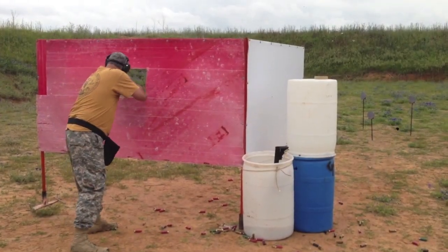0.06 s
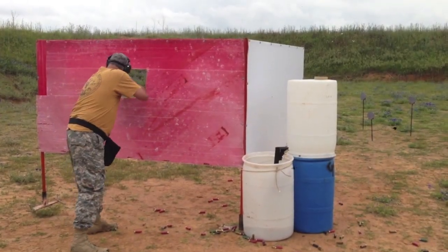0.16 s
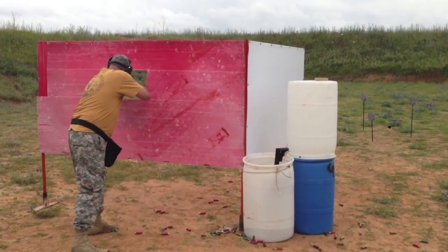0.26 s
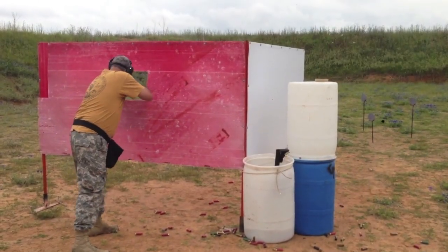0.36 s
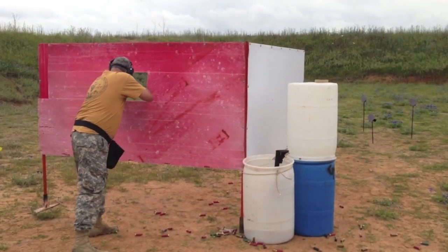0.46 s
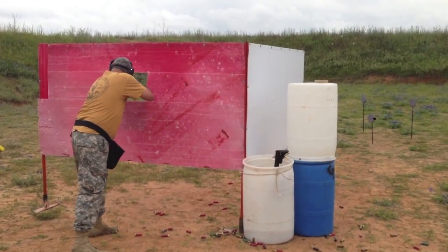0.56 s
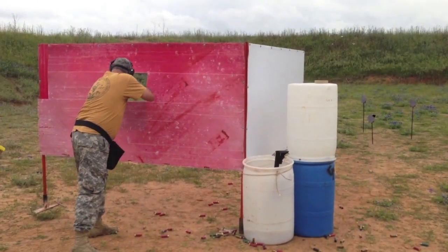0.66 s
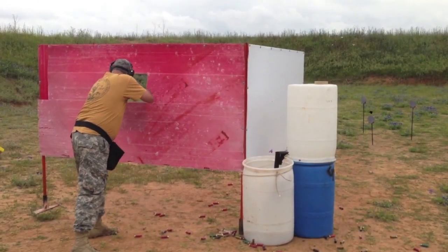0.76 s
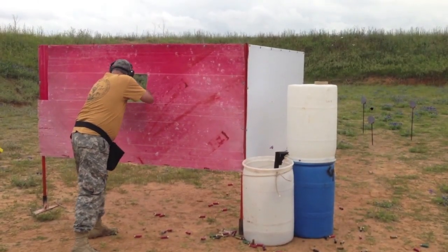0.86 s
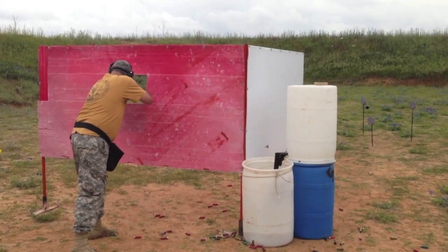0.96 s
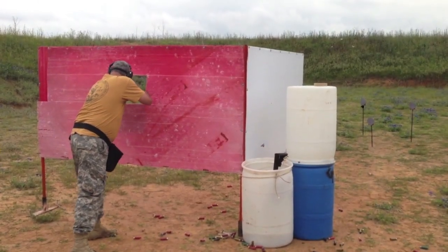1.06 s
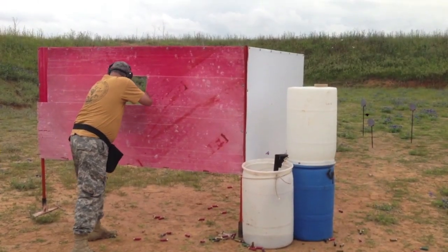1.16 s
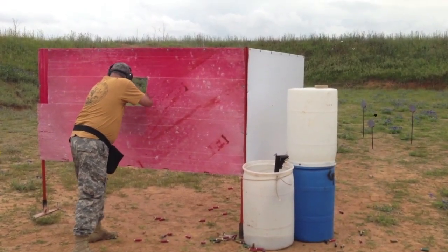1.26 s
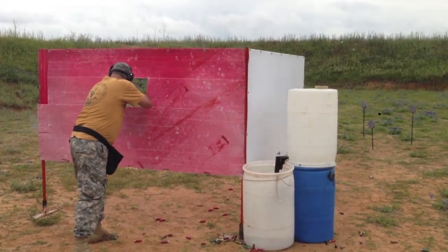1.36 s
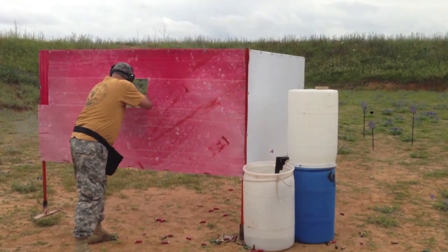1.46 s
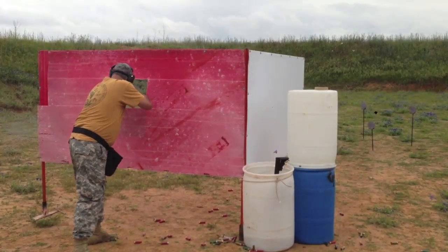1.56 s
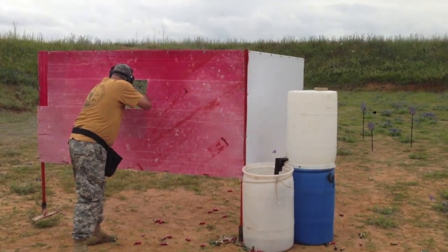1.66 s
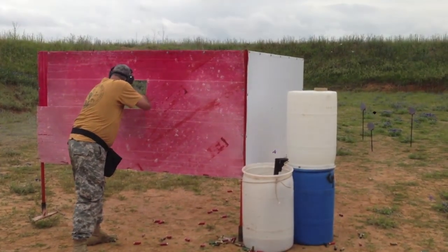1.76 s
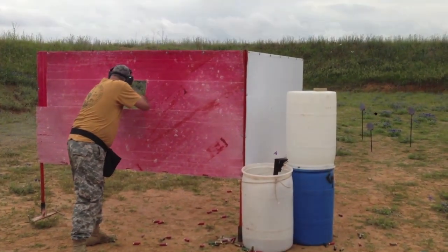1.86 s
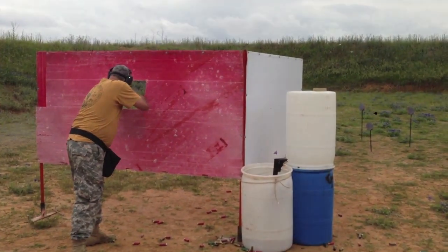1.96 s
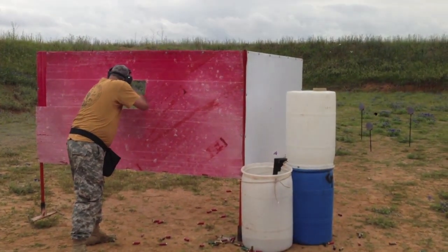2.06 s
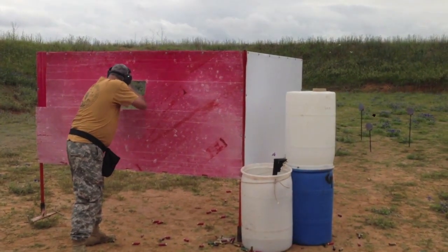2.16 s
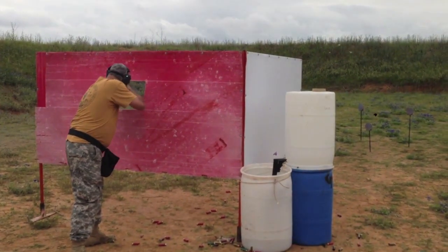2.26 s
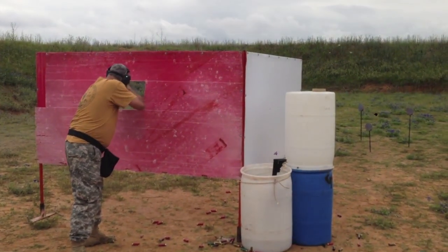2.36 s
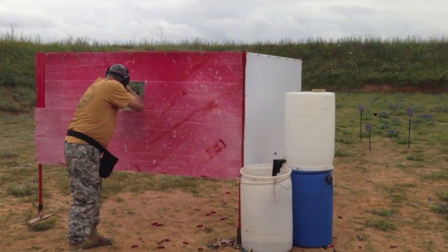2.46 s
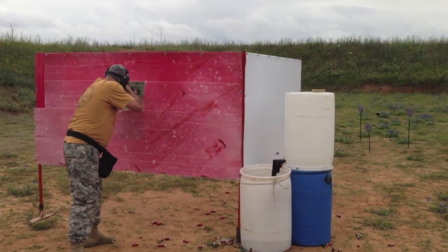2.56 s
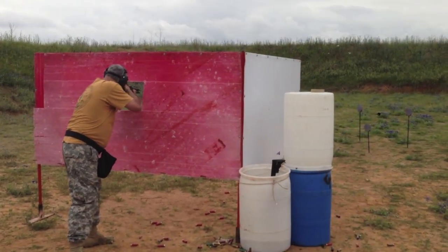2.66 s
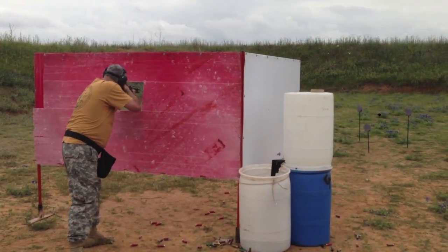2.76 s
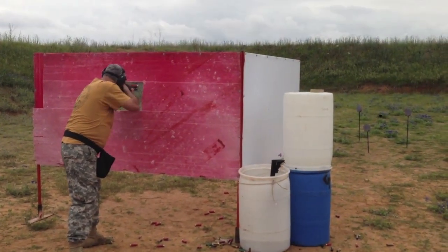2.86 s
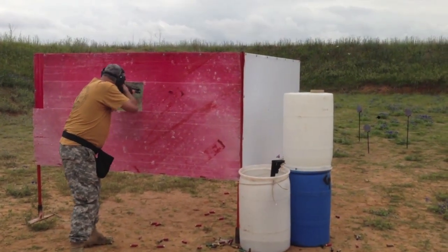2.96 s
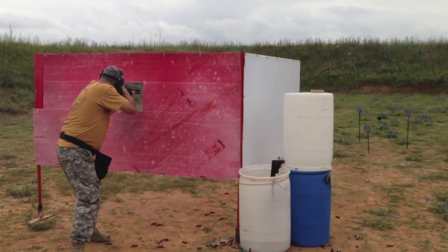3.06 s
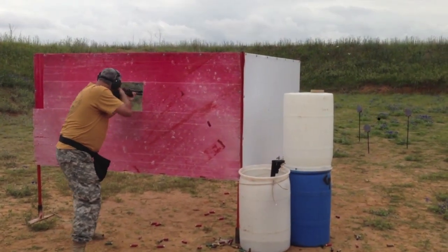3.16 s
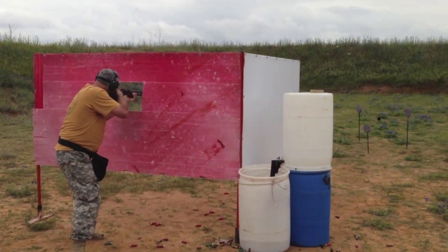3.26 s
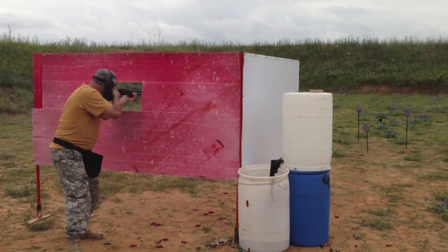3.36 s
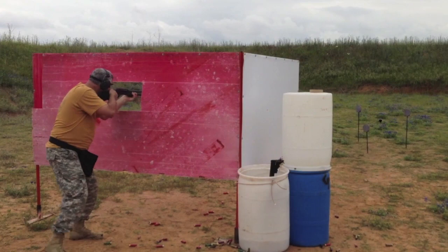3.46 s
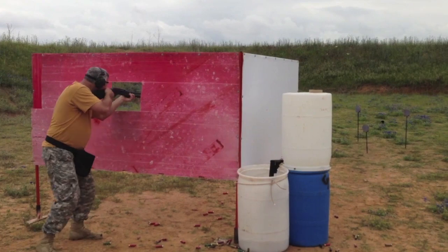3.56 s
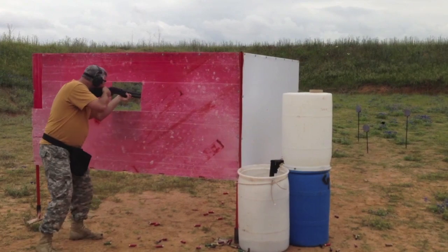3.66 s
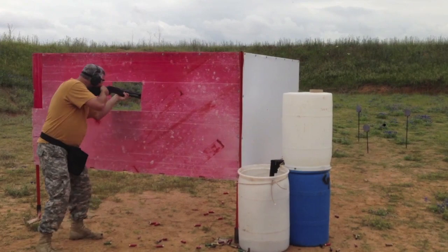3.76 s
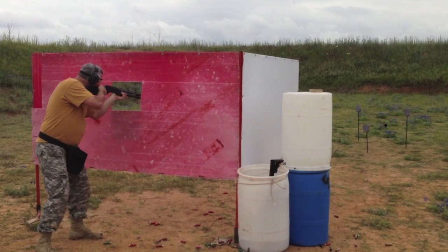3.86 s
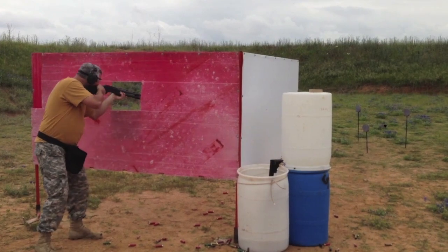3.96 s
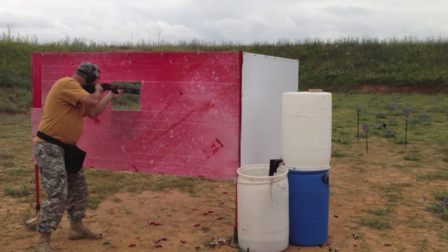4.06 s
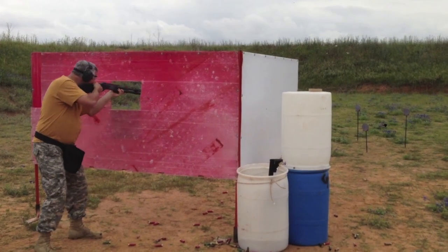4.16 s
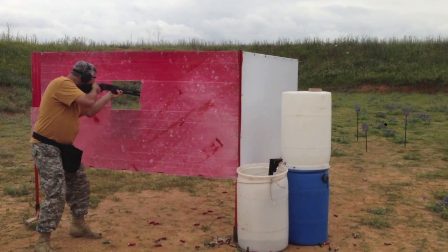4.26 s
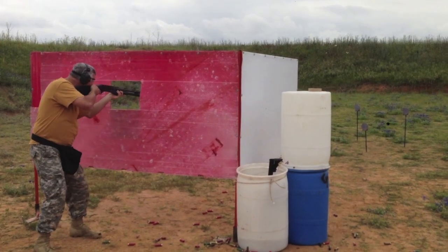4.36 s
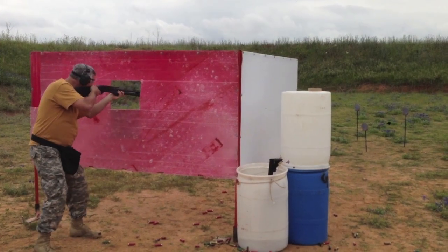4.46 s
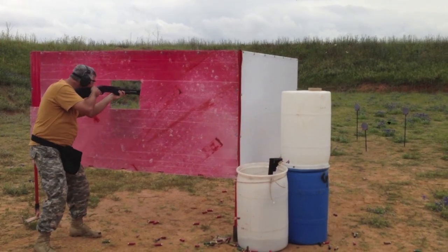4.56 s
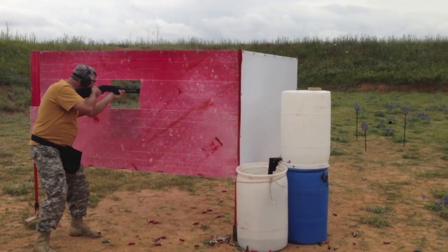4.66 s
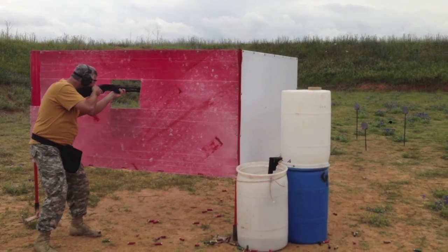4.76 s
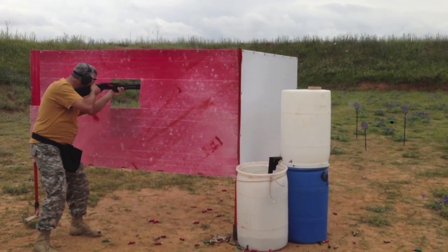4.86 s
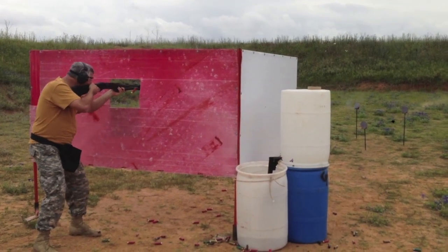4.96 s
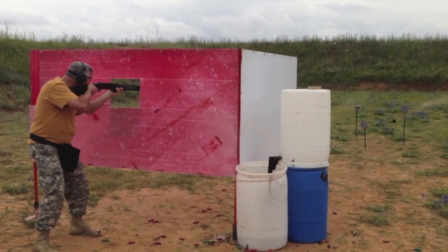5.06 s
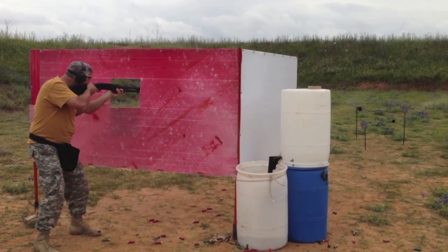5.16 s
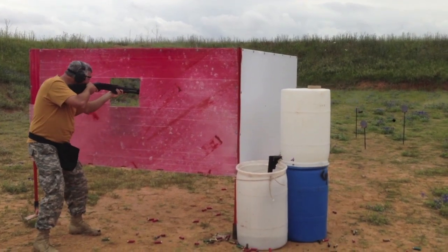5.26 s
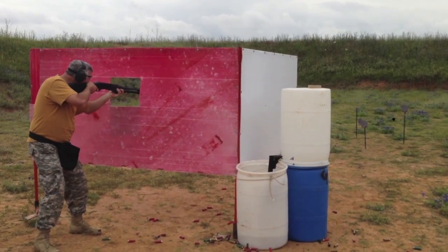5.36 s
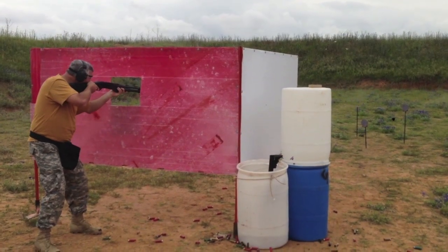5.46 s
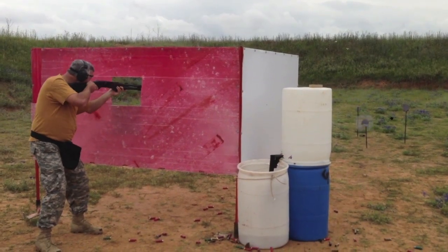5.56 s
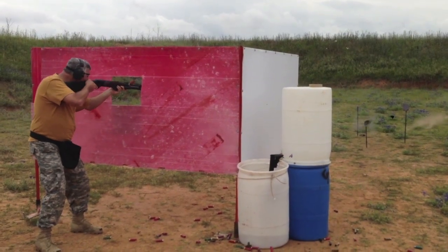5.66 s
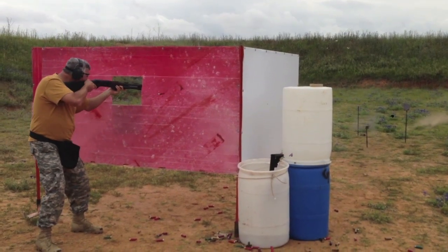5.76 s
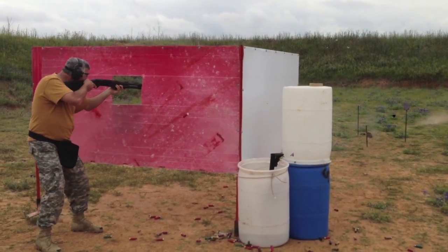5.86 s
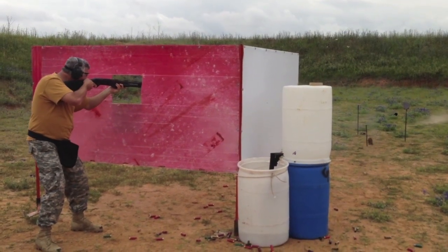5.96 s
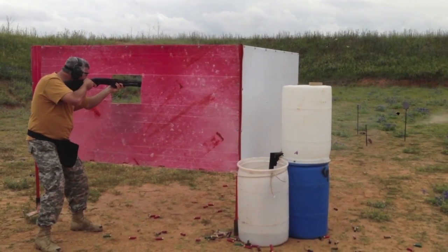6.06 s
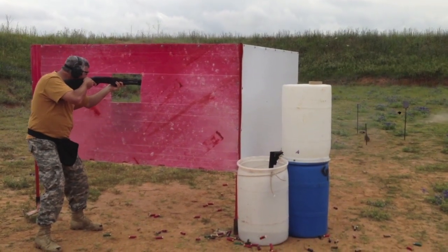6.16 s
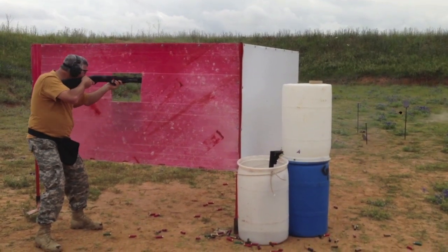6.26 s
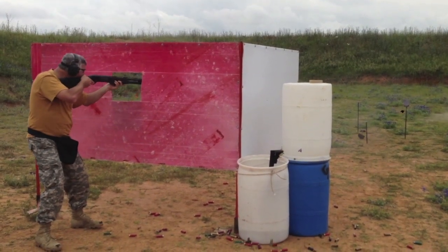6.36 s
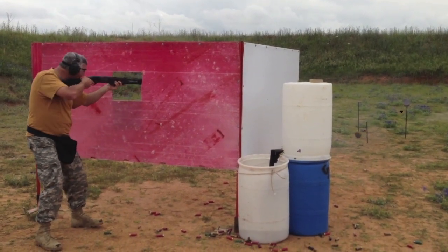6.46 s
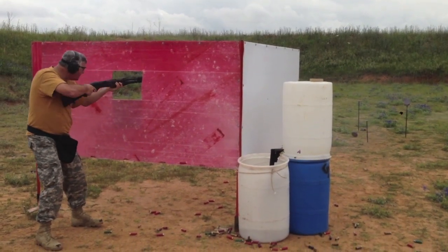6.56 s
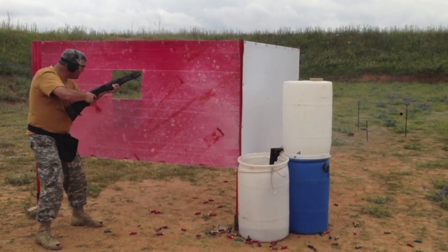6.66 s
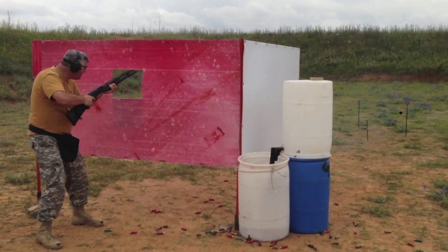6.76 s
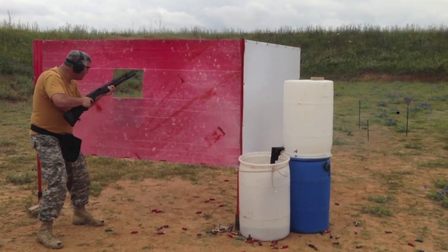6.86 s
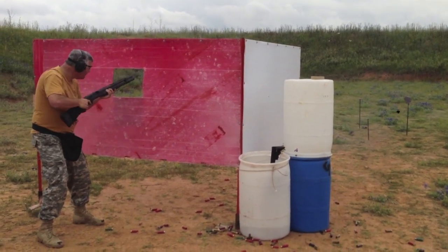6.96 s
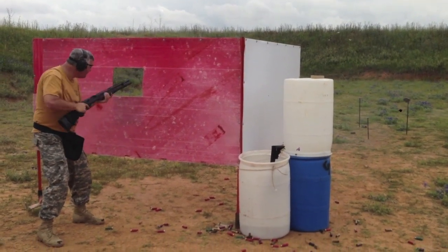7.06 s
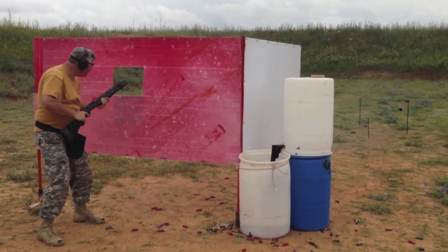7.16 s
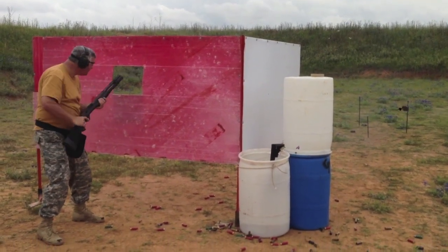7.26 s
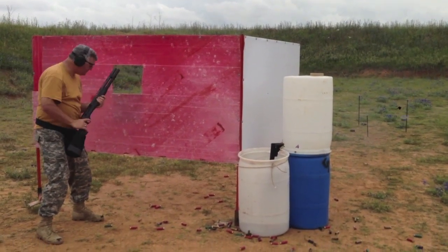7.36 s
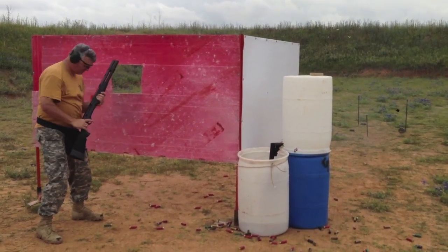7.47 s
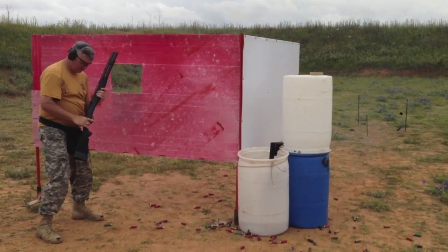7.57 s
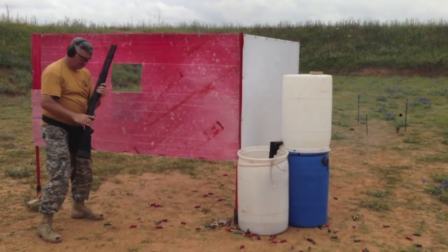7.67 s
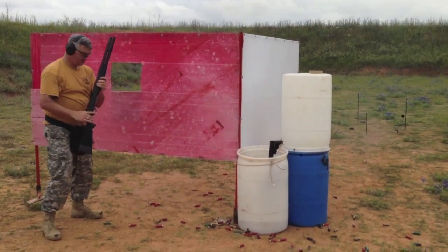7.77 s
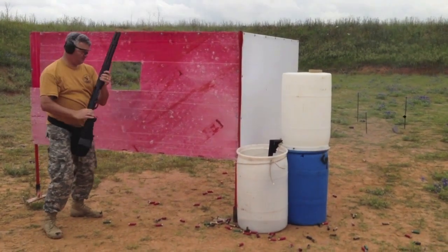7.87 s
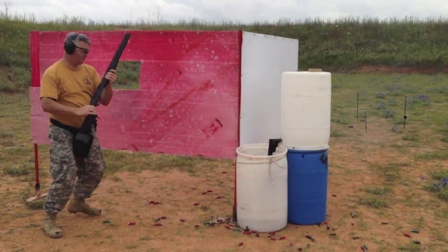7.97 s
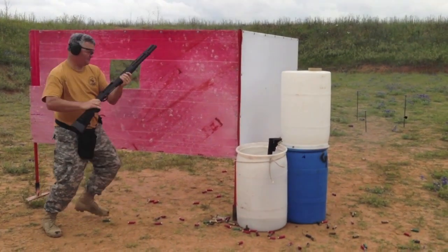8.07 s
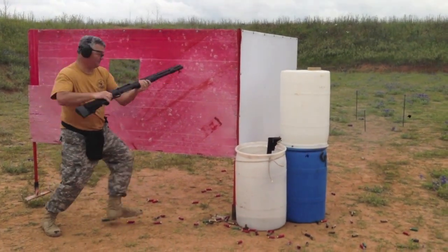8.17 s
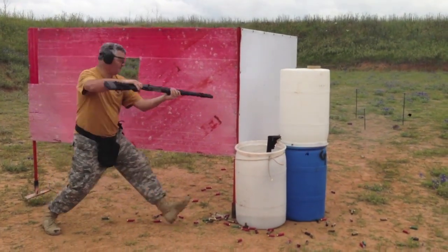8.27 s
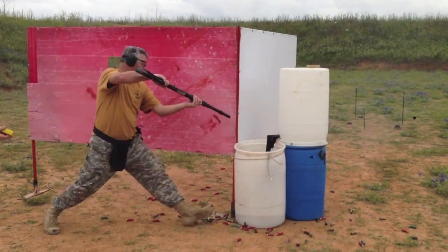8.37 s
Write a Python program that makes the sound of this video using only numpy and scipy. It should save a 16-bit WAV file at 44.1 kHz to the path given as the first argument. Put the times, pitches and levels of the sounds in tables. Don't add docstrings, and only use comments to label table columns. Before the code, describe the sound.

Outdoors, a shotgun fires seven spaced shots with sharp metallic action noise and rolling echoes, then quiet falls with faint knocks and distant birds.

```python
import sys
import numpy as np
from scipy import signal
from scipy.fft import rfft, irfft, next_fast_len
from scipy.io import wavfile
from scipy.ndimage import uniform_filter1d

SR = 44100
rng = np.random.default_rng(int(sys.argv[2]) if len(sys.argv) > 2 else 0)


def put_to_file(sound):
    columns = np.atleast_2d(sound).T
    safe = np.clip(columns, -1, 1)
    whole_steps = np.round(safe * 32767)
    wavfile.write(sys.argv[1], SR, whole_steps.astype(np.int16))


N = 371322
SHOT_SIZE = next_fast_len(SR)
LEAD_S = .05
SHOT_T = np.arange(SHOT_SIZE) / SR - LEAD_S
LATE = np.clip(SHOT_T / 0.087, 0, 1)


def undb(db):
    return 10 ** (np.asarray(db) / 20)


def unit(x):
    return x / np.sqrt(np.mean(x ** 2))


def coloured(spectrum, size):
    hz = np.arange(size // 2 + 1) * SR / size + 1
    points = np.array(spectrum)
    gain = undb(np.interp(np.log(hz), np.log(points[:, 0]), points[:, 1]))
    noise = rfft(rng.standard_normal(size)) * gain
    return rfft(unit(irfft(noise, size))), hz


def add(out, s, sound):
    i = int(s * SR)
    out[i:i + len(sound)] += sound[:N - i]


def swell(t, rise, t60):
    return undb(np.where(t < 0, 60 * t / rise, -60 * t / t60))


def band(x, hz, width):
    return signal.lfilter(*signal.iirpeak(min(hz, .45 * SR), hz / width, SR), x)


def twice(x, hz, width, second_width):
    return band(band(x, hz, width), hz, second_width)


def high_pass(x, order, hz):
    return signal.sosfilt(signal.butter(order, hz, "high", fs=SR, output="sos"), x)


def wander(rate, size):
    k = int(SR / rate)
    return uniform_filter1d(rng.standard_normal(size)[np.arange(size) // k], k)


def knock(crack_db, crack_hz, top_db, crack_t60, ring_db, ring_hz, ring_t60, spread=0.46, rise=0.0035, skirt=7.2):
    size = 4096
    t = np.arange(size) / SR - .002
    noise = rng.standard_normal(size)
    width = spread * crack_hz
    crack = undb(crack_db - 3.5) * unit(twice(noise, crack_hz, width, skirt * width))
    crack += undb(top_db + 1.5) * unit(twice(noise, 8000, 7000, 7000))
    crack *= swell(t, rise, crack_t60)
    crack *= undb(max(crack_db, top_db + 7)) / np.abs(crack).max()
    mode = np.sin(2 * np.pi * ring_hz * t) + 0.16 * unit(band(noise, ring_hz, 1.2 * ring_hz))
    return crack + undb(ring_db) * mode * swell(t, 0.0019, ring_t60)


def dull(db, hz, t60, noisy, broad=3.6):
    t = np.arange(SR // 4) / SR - .005
    grit = unit(twice(rng.standard_normal(len(t)), hz, 0.67 * hz, 2.4 * hz))
    blow = (np.cos(2 * np.pi * hz * t) + noisy * grit) * swell(t, 0.009, t60)
    blow = high_pass(twice(blow, hz, broad * hz, broad * hz), 3, 85)
    return undb(db) * blow / np.abs(blow).max()


# (delay t/s, t60 t/s, bass level/dB, middle level/dB, treble level/dB)
ARRIVALS = [(-.021, .05, -54, -44.5, -43.5), (-.008, 0.061, -46, -31, -40.5),
            (-.003, .03, -26.5, -26.5, -25.5), (-.0008, 0.012, -28.5, -17.5, -10.5),
            (.0024, 0.016, -32.5, -12, -5), (.0052, 0.03, -24.5, -12, -7),
            (0.011, 0.052, -24, -18.5, -17.5), (0.029, 0.49, -29.5, -27.5, -23.5),
            (0.066, 0.055, -28, -26.5, -32), (0.093, 0.057, -24, -24.5, -27),
            (.12, 0.33, -29, -33.5, -30.5), (0.152, 0.14, -35.5, -54.5, -38), (.194, .1, -19.5, -33, -30.5),
            (0.21, 0.1, -27.5, -44, -30), (.222, 0.12, -49, -45, -30), (0.245, 0.2, -58, -56, -46),
            (0.261, 0.93, -59, -52.5, -49.5), (0.351, 0.23, -47.5, -75, -74), (0.397, 0.2, -52.5, -63, -74)]


def arrival_levels():
    shapes = []
    for delay, t60, *_ in ARRIVALS:
        rise = min(0.27 * t60, 0.13)
        shapes.append(swell(SHOT_T - delay, rise, t60) ** 2)
    powers = undb(2 * np.array(ARRIVALS)[:, 2:])
    return np.sqrt(powers.T @ np.array(shapes))


def boom(low):
    near = 0.57 * high_pass(twice_tuned(low), 4, 110)
    far = undb(2) * twice(near, 170, 120, 120)
    thump = undb(1.5) * (1 - LATE) * low
    return near + np.clip((SHOT_T - 0.1946) / 0.029, 0, 1) * (far - near) + thump


def twice_tuned(low):
    return band(band(low, 168, 340), 230, 630)


def pressure_push():
    t = SHOT_T - .004
    return undb(-29) * swell(t, 0.0099, 0.046) * np.cos(2 * np.pi * 60 * t)


def receiver_ring(ring_db, ring_hz):
    shape = swell(SHOT_T + 0.0036, 0.029, 0.022) * (SHOT_T > ARRIVALS[0][0])
    return undb(ring_db - 25) * shape * np.sin(2 * np.pi * ring_hz * SHOT_T)


# (f/Hz, width f/Hz, level/dB)
PANEL = [
    (500, 160, 4.5),
    (2064, 700, 13.5),
]


def panel_drum(body):
    return (1 - LATE) * sum(undb(db) * band(body, hz, width) for hz, width, db in PANEL)


def grazing(body, sound):
    gained = undb(-2) * band(body, 1030, 370)
    lost = band(sound, 440.6, 140)
    return np.clip(SHOT_T / 0.61, 0, 1) * (gained - lost)


def echo_patches(sound):
    patches = 0
    for hz in (700, 1150, 1900, 3000, 4400, 6300, 8800, 11500, 14000):
        patches = patches + wander(40, SHOT_SIZE) * band(sound, hz, .3 * hz)
    return .6 * LATE * patches + np.clip(SHOT_T / 0.36, 0, 1) * band(sound, 2000, 270)


# (first upswing t/s, peak t/s, f/Hz, rise t/s, t60 t/s)
PULSES = [
    (.0078, .012, 200.4, .04, 0.03),
    (.0612, 0.0656, 204.9, 0.013, 0.042),
    (.192, .194, 195, .012, .1),
]


def low_pulses():
    pulses = []
    for first, peak, hz, rise, t60 in PULSES:
        pulses.append(swell(SHOT_T - peak, rise, t60) * np.sin(2 * np.pi * hz * (SHOT_T - first)))
    return np.array(pulses)


def crest_echo(db):
    hollow = unit(twice(rng.standard_normal(SHOT_SIZE), 927, 290, 580))
    return undb(db - 6.5) * hollow * swell(SHOT_T - 0.2218, .08, 0.073)


# (f/Hz, level/dB per Hz)
BLAST = [(15, -61.5), (25, -35), (102, -15), (206, -4), (405, -5), (818, -5.5), (1190, -8.5), (2550, -13),
         (3520, -9), (7510, -16), (8830, -15), (11900, -19.5), (14800, -23.5), (16000, -42)]
# (t/s, peak level/dB, extra bass level/dB, extra tail level/dB, bolt closing level/dB)
SHOTS = [(1.405, -0.5, -6, -1.44, -17), (2.196, -2.5, -5.5, 0.04, -17), (2.946, -5, -6, 1.5, -17),
         (4.148, 0, -6, -1.5, -18.5), (4.975, -4, -2.5, 0.87, -13.5), (5.683, 1, -1.5, -1.46, -8),
         (6.33, 1.5, 1, -1.4, -7)]
# (panel level/dB, wall level/dB, bank level/dB, crest level/dB)
AIM = [(-23.5, -18, -48, -34), (-19.5, -21, -29.5, -29), (-23, -22.5, -31, -27.5), (-23, -27, -34, -31),
       (-13.5, -33, -31.5, -24.5), (-14.5, -34, -28, -28), (-19, -29.5, -32, -30.5)]
# (t/s, peak level/dB, receiver ring level/dB, ring f/Hz)
HAMMERS = [(1.3835, -29, 6.5, 2950), (2.1748, -34.5, 2.5, 2950), (2.925, -32, 2.5, 2950),
           (4.1262, -31.5, -7.5, 2900), (4.9528, -33, 2.5, 2650), (5.6615, -40, -5, 2700),
           (6.308, -37.5, -6, 3200)]


def gunfire():
    out = np.zeros(N)
    site, hz = coloured(BLAST, SHOT_SIZE)
    below_bass, below_middle, below_air = [1 / (1 + (hz / edge) ** 6) for edge in (376, 1800, 7800)]
    bass, middle, treble = arrival_levels()
    push, pulses = pressure_push(), low_pulses()
    for (s, db, bass_db, tail_db, _), aim, (hammer_s, _, ring_db, ring_hz) in zip(SHOTS, AIM, HAMMERS):
        fresh = coloured(BLAST, SHOT_SIZE)[0]
        low = unit(irfft((site + 1.5 * fresh) * below_bass, SHOT_SIZE))
        low *= undb(bass_db * (0.5 - LATE)) * bass
        sound = boom(low) + push + receiver_ring(ring_db, ring_hz)

        middle_lumps = undb(3.6 * np.tanh(wander(200, SHOT_SIZE)))
        treble_lumps = undb(1.3 * wander(500, SHOT_SIZE))
        body = unit(irfft(fresh * (below_middle - below_bass), SHOT_SIZE))
        body *= 0.66 * middle * middle_lumps
        sound += body + panel_drum(body)
        sound += grazing(body, sound)

        top = undb(-2.5 - 14.5 * np.maximum(SHOT_T, 0)) * irfft(fresh * (1 - below_air), SHOT_SIZE)
        bright = irfft(fresh * (below_air - below_middle), SHOT_SIZE) + top
        sound += 1.513 * treble * treble_lumps * bright
        sound += echo_patches(sound)
        sound *= (SHOT_T > hammer_s - s) * undb(.6 * db - 3.5 + tail_db * LATE)
        pulse = high_pass(undb(aim[:3]) @ pulses, 4, 110)
        add(out, s - LEAD_S, sound + pulse + crest_echo(aim[3]))
    return out


def clack(out, s, db, hz, top_db, body_db, t60):
    body_hz = 1260 * undb(0.58 * rng.standard_normal())
    add(out, s - .001, knock(db + 1.5, hz, top_db + 2, t60, body_db + 5, body_hz, 0.0093))


# (t/s, crack level/dB, crack f/Hz, body level/dB)
BOLT_BACK = [(1.4396, -9.5, 4684, -10), (2.2289, -15.5, 3543, -21), (2.2316, -10.5, 5200, -24.5),
             (2.98, -11.5, 2940, -16), (2.9881, -4, 4070, -29.5), (4.1604, -11.5, 3353, -25),
             (4.1801, -9, 4178, -13), (4.1843, -11.5, 4290, -21), (4.1915, -14.5, 4410, -15.5),
             (5.012, -6.5, 4090, -21), (5.0189, -10.5, 4640, -21), (5.023, -2.5, 4355, -31.5),
             (5.7206, 1, 5580, -24), (5.7264, -7.5, 4278, -23.5), (6.3424, -10, 3187, -13.5),
             (6.3749, -2.5, 5680, -15.5), (6.3974, -26.5, 3140, -26.5), (6.4196, -35, 3094, -28)]
# (t/s, level/dB, f/Hz, t60 t/s)
SLIDES = [(1.4375, -23, 3000, .015), (1.4425, -17.5, 2100, .02), (1.4503, -16, 4000, .018),
          (1.556, -27, 4200, 0.026), (2.2255, -20, 4200, 0.014), (2.24, -16, 3500, 0.026),
          (2.991, -15, 3200, 0.017), (3.0993, -22, 4260, 0.02), (4.182, -14, 1780, .025),
          (4.186, -16, 2500, .02), (4.194, -19.5, 1400, .03), (4.278, -19.5, 2900, 0.032),
          (5.003, -23, 3000, .04), (5.0205, -16, 2490, .02), (5.101, -25, 4200, .015),
          (5.106, -18.5, 2700, 0.022), (5.7115, -15, 6000, 0.011), (5.7225, -12.5, 5000, 0.02),
          (5.729, -18, 3000, .025), (6.3585, -16, 3500, .025), (6.365, -18, 1200, 0.018),
          (6.382, -23, 4000, .015), (6.4, -25, 3500, 0.017), (6.4614, -25, 4100, .015)]
# (delay t/s, top level/dB and body level/dB against the crack, t60 t/s)
RELOAD = [
    (0.0909, -19.5, -19, 0.023),
    (0.1133, -15, 2.5, .007),
]
# (carrier level/dB, chamber level/dB)
FEED = [(-21, -36), (-21, -33), (-23.5, -29), (-17.5, -32), (-20.5, -26.5), (-21, -23.5), (-29, -20)]


def bolt():
    out = np.zeros(N)
    bolt_t60, close_hz = 0.0067, 3500
    for s, db, hz, body_db in BOLT_BACK:
        top_db = db - 14 + 6.5 * np.log2(hz / 4000)
        clack(out, s, db, hz, top_db, body_db, bolt_t60)
    for s, db, hz, t60 in SLIDES:
        clack(out, s, db, hz, db - 19.5, db - 16, t60)
    for (s, *_, db), feed in zip(SHOTS, FEED):
        clack(out, s + .1385, db, close_hz, db - 23 + .6 * (db + 9.5), db - 12.5, bolt_t60)
        for (delay, top_db, body_db, t60), feed_db in zip(RELOAD, feed):
            clack(out, s + delay, feed_db, close_hz, feed_db + top_db, feed_db + body_db, t60)
    return out


# (t/s, level/dB, f/Hz)
BLAST_CRACKS = [(1.4065, -8.5, 2100), (2.1975, -12.5, 2500), (2.9475, -11.5, 2800), (4.1495, -9.5, 2300),
                (4.977, -14.5, 2600), (5.685, -8.5, 2200), (6.3315, -9, 1950)]


def blast_cracks():
    out = np.zeros(N)
    for s, db, hz in BLAST_CRACKS:
        clack(out, s, db, hz, db - 30, db - 20, 0.023)
    return out


def hammer_falls():
    out = np.zeros(N)
    for s, db, *_ in HAMMERS:
        add(out, s - .002, knock(db, 3500, db - 11, 0.051, db - 19, 600, .02, rise=.0016))
    return out


# (t/s, f/Hz, level/dB, t60 t/s, half turn t/s)
STEEL = [(1.53, 7785, -50, .5, .12), (1.66, 7785, -62, .6, .08), (1.745, 7785, -69, .8, .08),
         (2.315, 4076, -41, 1.2, .13), (2.455, 4076, -53, .6, .125), (2.575, 4076, -67, 1.0, .13),
         (3.2, 1895, -62, 1.5, .07), (3.27, 1895, -61, 2.0, .12), (3.385, 1895, -66, 1.2, .13),
         (3.25, 7705, -69, .7, .15), (3.4, 1500, -74, 1.5, .11), (5.015, 8434, -36, .4, .14),
         (5.81, 2025, -40, .4, .075), (5.9, 2025, -52, .6, .05), (5.965, 2025, -56, 2.0, .04),
         (6.025, 2025, -55, 2.0, .072), (6.1, 2025, -55, 1.5, .09), (6.215, 2025, -64, 1.5, .075),
         (5.925, 1745, -53, 3.0, .18), (6.12, 1745, -66, 1.5, .11), (5.81, 3007, -42, .5, .075),
         (5.935, 3007, -50, 4.0, .12), (6.17, 3007, -74, 1.5, .05), (5.96, 4161, -56, 4.0, .1),
         (6.11, 4161, -73, 1.5, .07), (7.3, 1583, -76, .4, .04), (7.63, 1583, -81, 2.0, .06),
         (7.345, 1583, -79, 9.0, .155), (7.195, 3010, -76, .5, .07), (2.465, 2060, -56, .35, .08),
         (3.3, 2650, -66, .4, .07)]


def steel_targets():
    out, t = np.zeros(N), np.arange(SR) / SR
    for s, hz, db, t60, turn in STEEL:
        turned = np.minimum(t / turn, 1)
        facing = np.hypot(np.sin(np.pi * turned) ** 0.76, undb(-18) * turned)
        edge_on = swell(np.maximum(t - turn, 0), 1, .12)
        level = undb(db + 5 + 2.2 * wander(60, SR))
        add(out, s, level * facing * swell(t, 1, t60) * edge_on * np.sin(2 * np.pi * hz * (t + s)))
    return out


# (t/s, crack level/dB, hollow ring level/dB, ring
# f/Hz)
HULLS = [(1.259, -66, -52.5, 1780), (2.149, -46.5, -60, 1274), (2.77, -53, -61, 1266),
         (3.612, -42.5, -38.5, 1280), (3.6662, -48, -56, 1290), (3.765, -52.5, -54.5, 1290),
         (3.7924, -43, -57.5, 1266), (3.8192, -53, -62, 1327), (3.875, -66, -62, 1213),
         (4.579, -39, -48, 890), (4.585, -31, -50, 1242), (4.7844, -41.5, -40.5, 1274),
         (4.938, -60, -78.5, 907), (5.561, -32.5, -30, 1253), (5.6117, -46, -52, 1246),
         (6.903, -45.5, -44.5, 1242), (7.62, -61, -67, 867), (3.888, -67, -63, 1400),
         (3.92, -68, -60, 1240), (4.025, -72, -66, 1253)]
# (t/s, level/dB, f/Hz)
TUMBLES = [
    (0.416, -46, 1570),
    (3.612, -41, 1100),
    (4.584, -31, 840),
    (4.585, -29, 1240),
    (4.5985, -38, 840),
    (4.612, -44, 700),
    (5.541, -39, 980),
    (5.544, -24, 830),
    (5.551, -40, 1110),
    (5.574, -37.5, 1070),
]


def hulls():
    out = np.zeros(N)
    for s, db, ring_db, ring_hz in HULLS:
        add(out, s - .001, knock(db - 3, 3670, db - 22, 0.03, ring_db + 3.5, ring_hz, .045))
    for s, db, hz in TUMBLES:
        add(out, s - .003, dull(db - 3.5, hz, 0.071, 4.4))
    return out


# (t/s, level/dB, f/Hz, top level/dB)
TICKS = [(0.4164, -26, 3050, -52), (1.1637, -48, 2450, -59), (1.259, -54, 3600, -80),
         (1.275, -48, 4960, -71), (1.8462, -48, 5280, -53), (1.8645, -38.5, 3900, -46.5),
         (1.906, -50, 4080, -73), (2.807, -58, 3800, -67), (4.7525, -50, 3130, -62),
         (4.7574, -54, 4200, -54), (5.4952, -32.5, 5170, -57), (5.5415, -39, 4570, -40.5),
         (6.0694, -40, 5540, -48), (6.0882, -47, 4120, -48), (6.1803, -49, 3140, -50),
         (6.2115, -38.5, 3760, -63), (6.233, -43, 3560, -49.5), (6.6994, -44, 7360, -52),
         (6.744, -43, 3800, -61), (6.8044, -45.5, 6300, -61), (6.892, -51, 5510, -70),
         (6.933, -56.5, 5390, -66), (6.999, -57, 4000, -67), (7.129, -54.5, 2980, -71),
         (7.144, -53.5, 3940, -73.5), (7.2673, -37.5, 3860, -70), (7.4036, -51, 3940, -71.5),
         (7.6194, -52, 1880, -55), (7.6894, -56.5, 1994, -73), (8.29, -57, 5390, -67)]
# (t/s, level/dB, f/Hz)
THUDS = [(0.228, -55, 358), (0.453, -48, 149), (0.489, -34.5, 159), (0.519, -47.5, 153), (1.164, -49, 363),
         (1.186, -50, 159), (1.237, -28.5, 260), (1.261, -42.5, 162), (1.227, -44, 200), (1.277, -49, 220),
         (1.303, -50, 260), (1.319, -50, 200), (1.345, -56, 220), (1.364, -54, 220), (0.35, -59, 169),
         (0.397, -57, 200), (7.655, -58, 221), (7.708, -63, 190), (5.657, -42.5, 300), (1.846, -37.5, 540),
         (1.864, -39, 680), (1.907, -52.5, 216), (1.969, -57, 764), (2.05, -47, 203.7), (2.761, -52.5, 869),
         (3.473, -46.5, 306), (3.479, -47, 289), (3.496, -52, 278), (3.574, -50, 805), (3.707, -59, 189.6),
         (5.639, -28.5, 232), (7.195, -57.5, 446.7), (7.489, -60, 845), (7.621, -40.5, 238),
         (7.634, -47.5, 137), (7.744, -66, 143), (4.588, -46.5, 228.3), (5.55, -41.5, 226.8),
         (8.06, -57, 257), (7.671, -64, 140), (1.3945, -13, 522), (1.4, -13.5, 500), (1.408, -16, 480),
         (4.149, -15, 760), (2.199, -17, 520.6), (5.728, -22.5, 230.2), (8.33, -60.5, 190)]


def kit_and_boots():
    out = np.zeros(N)
    for s, db, hz, top_db in TICKS:
        add(out, s - .001, knock(db - 2.5, hz, top_db - 2.5, 0.017, db - 15, hz, 0.017, spread=0.71, skirt=2.2))
    for s, db, hz in THUDS:
        add(out, s - .001, dull(db - 1.5, hz, 0.032 * min(220 / hz, 1.2), 0.5, broad=3.7))
    return out


# (peak t/s, length t/s, hiss level/dB, crunch level/dB)
SCUFF = [(1.294, 0.12, -62.5, -70), (1.365, 0.032, -71.5, -75), (1.927, 0.18, -69.5, -74),
         (2.156, 0.02, -63.5, -61), (3.558, 0.14, -68.5, -64.5), (3.623, 0.032, -64, -63.5),
         (3.67, 0.031, -70.5, -73), (3.869, 0.16, -75, -69), (3.952, 0.067, -61.5, -72.5),
         (4.04, .06, -81, -74.5), (4.828, 0.039, -64.5, -72), (4.925, 0.048, -67.5, -84),
         (5.423, 0.047, -62, -78.5), (5.487, 0.023, -60.5, -68), (5.575, 0.022, -59.5, -50.5),
         (5.629, 0.052, -62, -55.5), (6.01, 0.34, -54, -71), (6.91, 0.02, -59, -59),
         (7.001, 0.062, -69, -72), (7.888, 0.14, -74.5, -75), (8.092, 0.12, -67, -68.5),
         (8.33, 0.077, -67.5, -76), (8.402, 0.15, -74.5, -71.5)]


def rustle():
    out, t = np.zeros(N), np.arange(N) / SR
    peak, length, hiss_db, crunch_db = np.array(SCUFF).T
    shapes = undb(-13 * np.abs(2 * (t - peak[:, None]) / length[:, None]) ** 0.71)
    for db, hz, width in ((hiss_db, 3600, 3800), (crunch_db, 750, 570)):
        noise = unit(twice(rng.standard_normal(N), hz, width, width))
        out += noise * undb(2.2 * wander(180, N)) * (undb(db) @ shapes)
    return out


# (t/s, start f/Hz, end f/Hz, length t/s, level/dB)
BIRDS = [(0.178, 3970, 3400, 0.016, -65), (0.57, 4500, 3200, 0.03, -63), (4.914, 3300, 3500, .012, -61),
         (4.925, 3350, 3350, 0.011, -61), (4.934, 3550, 3450, 0.013, -56), (4.836, 3550, 3350, 0.015, -60),
         (0.762, 4300, 3500, 0.025, -70), (7.635, 2900, 3200, .025, -72), (1.937, 4600, 3020, 0.039, -66),
         (1.946, 4000, 4600, .02, -64), (2.001, 4700, 3500, 0.031, -69), (4.867, 4210, 4180, .025, -67),
         (7.582, 3200, 3150, 0.026, -70), (7.61, 3250, 3400, 0.024, -68), (7.917, 3450, 3305, 0.037, -74),
         (7.8, 3570, 3500, .025, -72.5), (7.951, 3900, 4100, 0.051, -76), (8.07, 4500, 5250, .03, -75.5),
         (8.139, 530, 680, 0.037, -64), (8.28, 5500, 5200, 0.027, -71.5), (8.278, 4770, 4250, 0.018, -72.5),
         (8.295, 4730, 4200, 0.029, -72), (8.8, 4300, 2900, .04, -70), (7.668, 4350, 4260, 0.016, -71)]


def birds():
    out = np.zeros(N)
    for s, start_hz, end_hz, length, db in BIRDS:
        glide = np.linspace(start_hz, end_hz, int(length * SR))
        level = undb(db + 3 * wander(300, len(glide))) * np.hanning(len(glide)) ** 0.46
        add(out, s, level * np.sin(2 * np.pi * np.cumsum(glide) / SR))
    return out


# (f/Hz, level/dB per Hz)
HUSH = [(15, -59.5), (25, -31), (59, -22.5), (123, -1.5), (200, 1), (363, -5), (451, -4.5), (1040, -10.5),
        (1400, -11.5), (3920, -8), (14800, -13.5), (16000, -29.5)]
# (t/s, level/dB)
HUSH_DB = [
    (0, -66.5),
    (1.3, -67.5),
    (2.1, -71.5),
    (4.1, -71),
    (7.1, -71.5),
    (7.7, -70),
    (8.42, -68),
]


def hush():
    t, size = np.arange(N) / SR, next_fast_len(N)
    level_db = np.interp(t, *np.transpose(HUSH_DB)) + 0.87 * wander(6.5, N)
    return irfft(coloured(HUSH, size)[0], size)[:N] * undb(level_db)


def scene():
    gun = gunfire() + bolt() + blast_cracks() + hammer_falls()
    around = steel_targets() + hulls() + kit_and_boots() + rustle() + birds() + hush()
    return (gun + around)[None, :]


def band_limit(x):
    return signal.sosfilt(signal.butter(12, 16470, fs=SR, output="sos"), x)


def record(dry):
    rounded = .72 * np.tanh(dry / .72)
    top_cut = signal.cheby2(12, 45, 1.03 * 15300, fs=SR, output="sos")
    return band_limit(signal.sosfilt(top_cut, rounded))


dry = scene()
out = record(dry)
put_to_file(out)
```